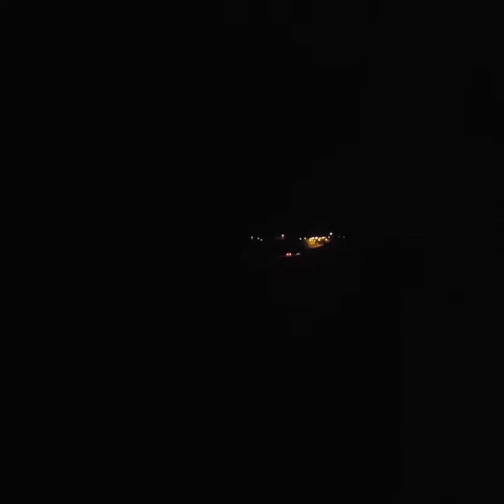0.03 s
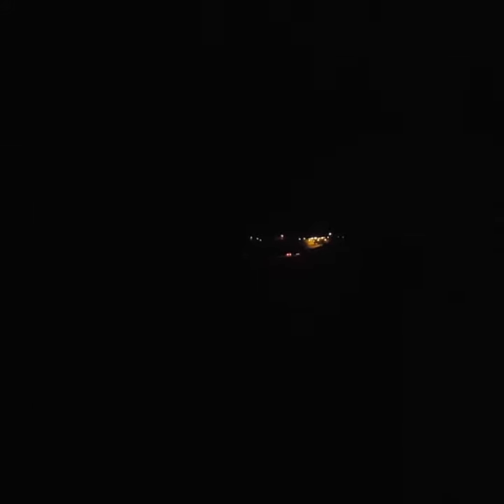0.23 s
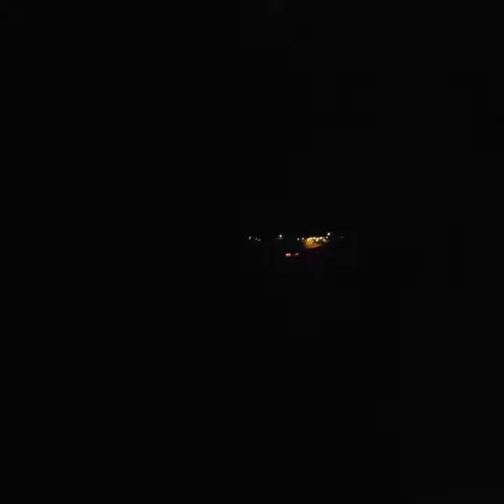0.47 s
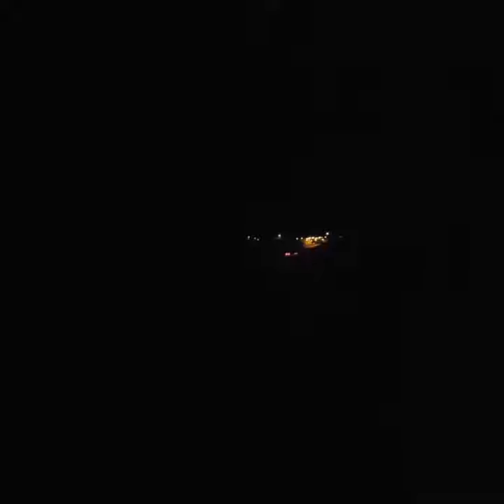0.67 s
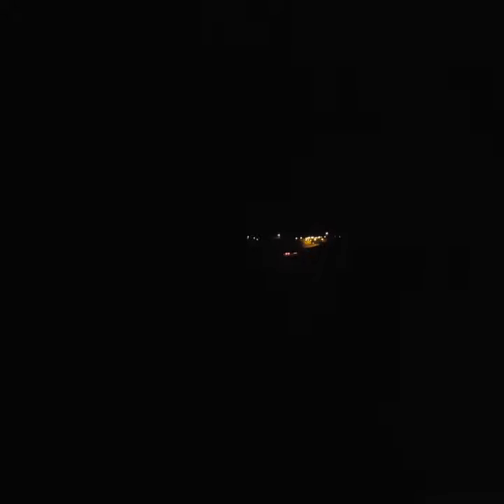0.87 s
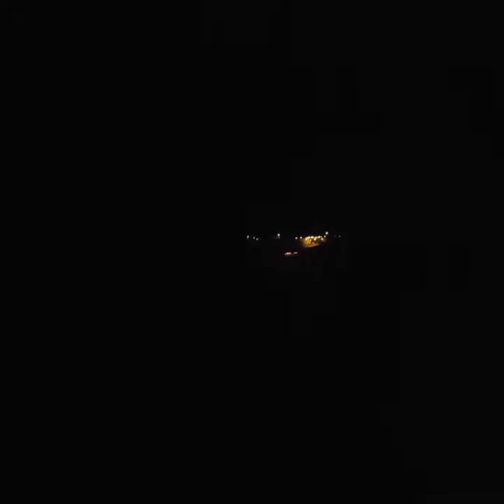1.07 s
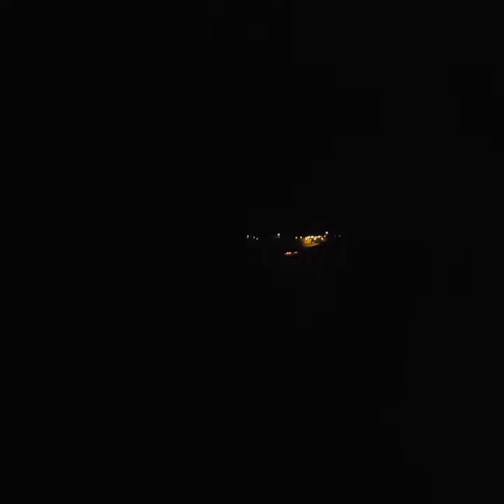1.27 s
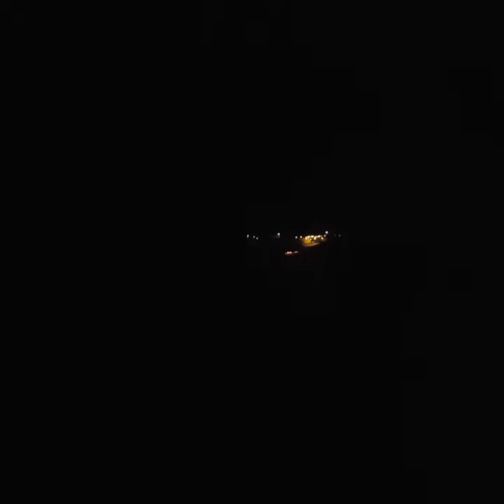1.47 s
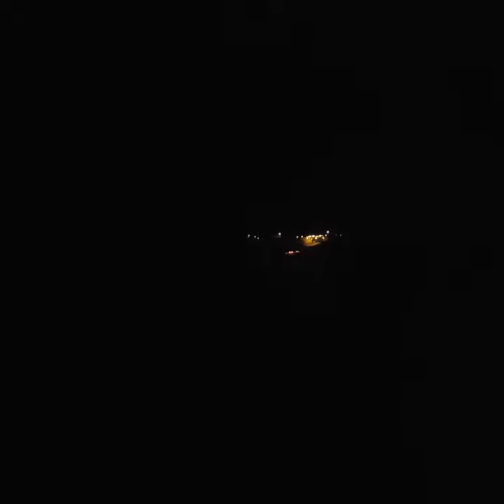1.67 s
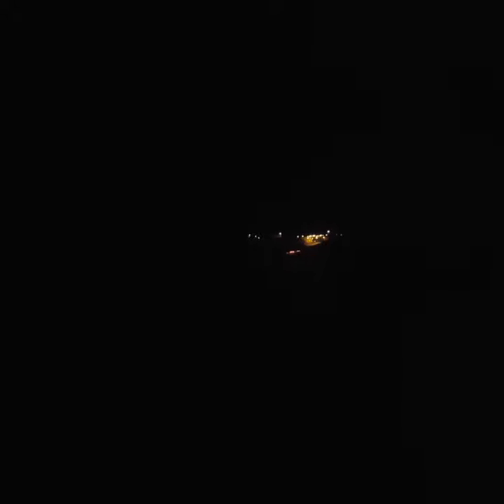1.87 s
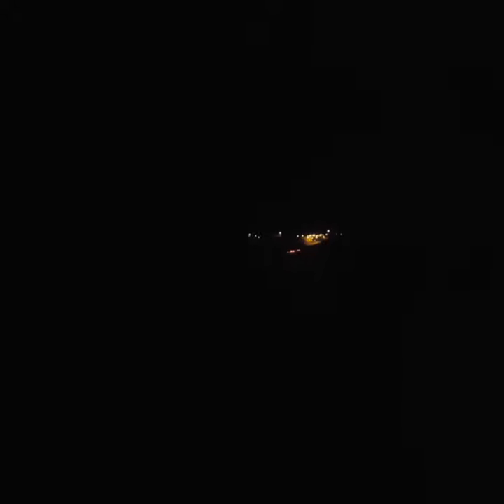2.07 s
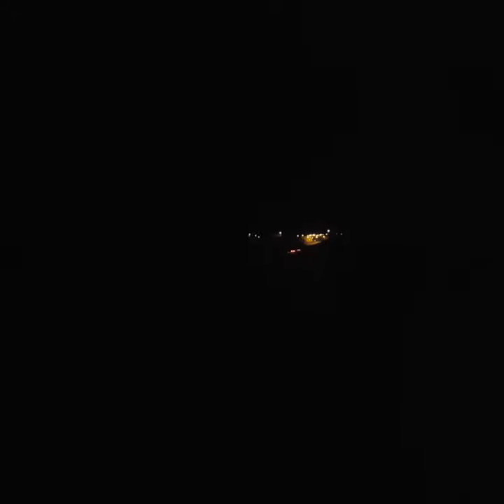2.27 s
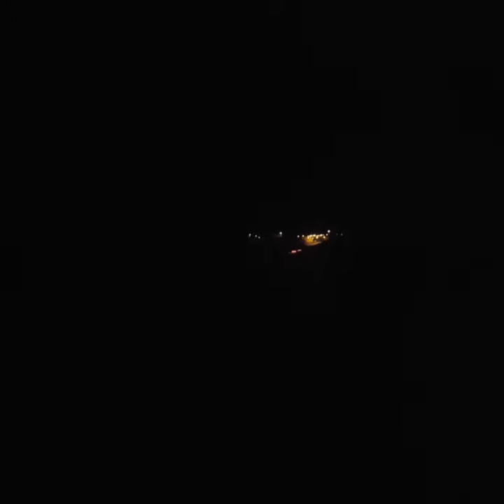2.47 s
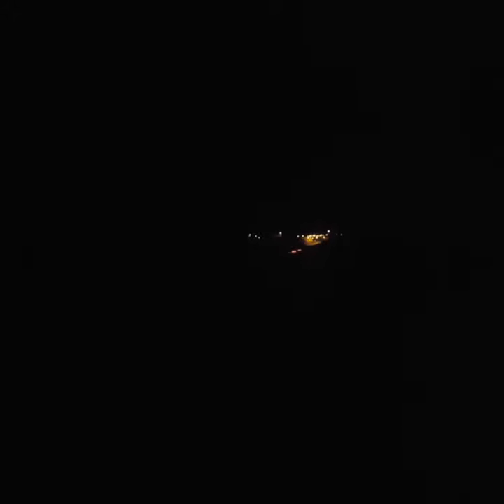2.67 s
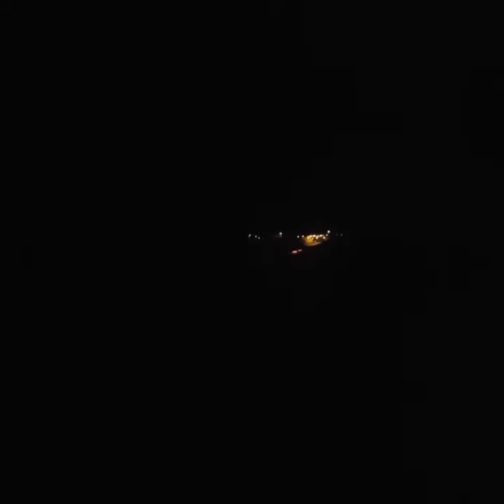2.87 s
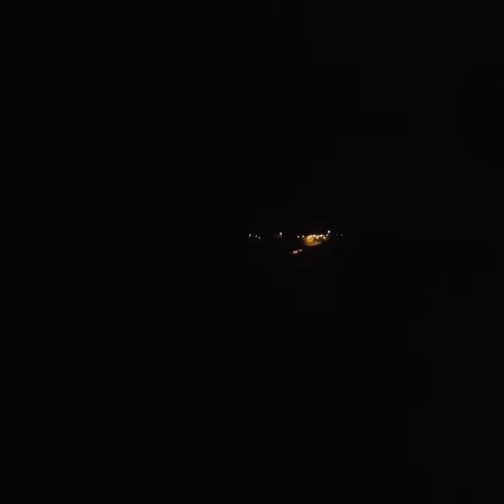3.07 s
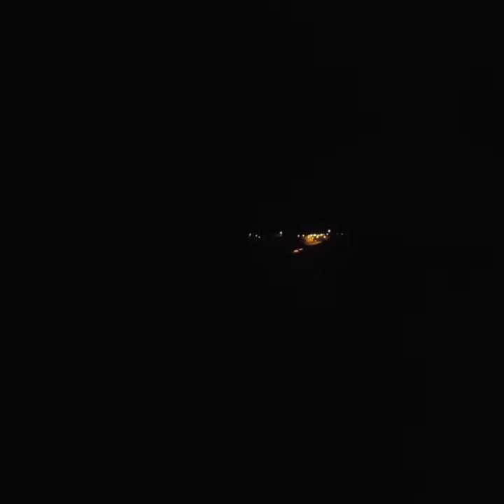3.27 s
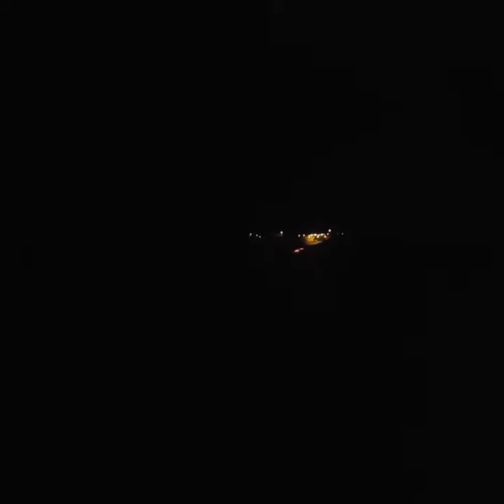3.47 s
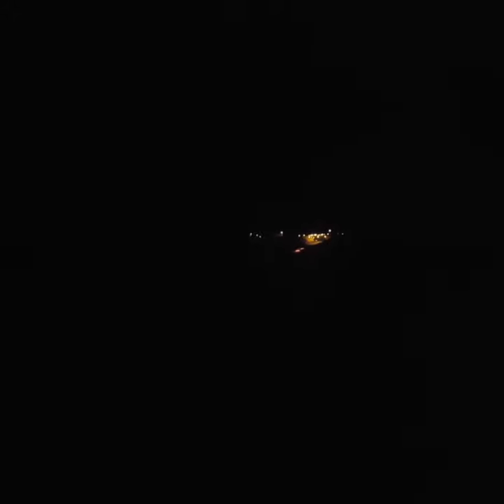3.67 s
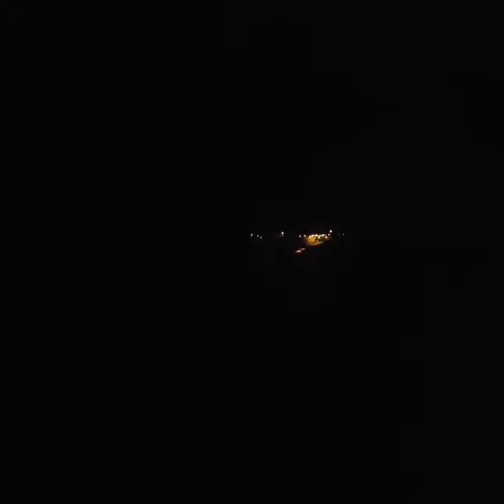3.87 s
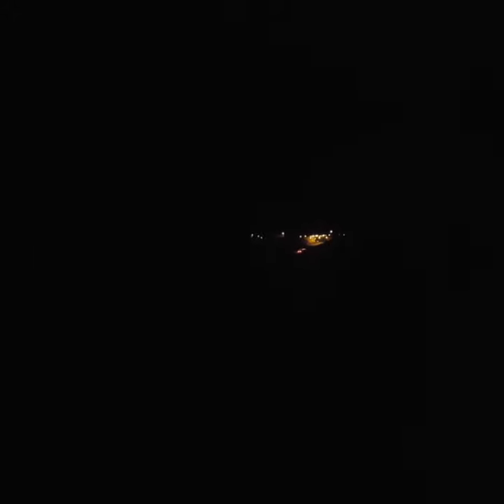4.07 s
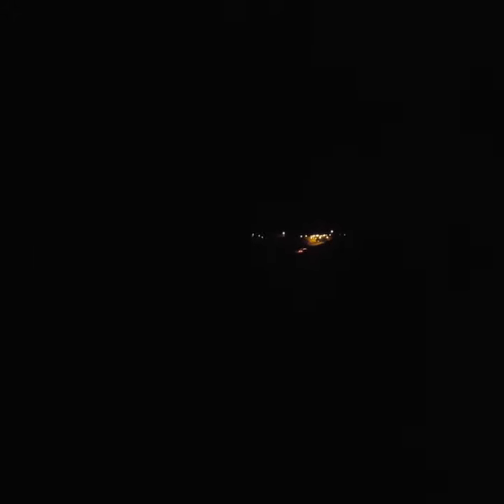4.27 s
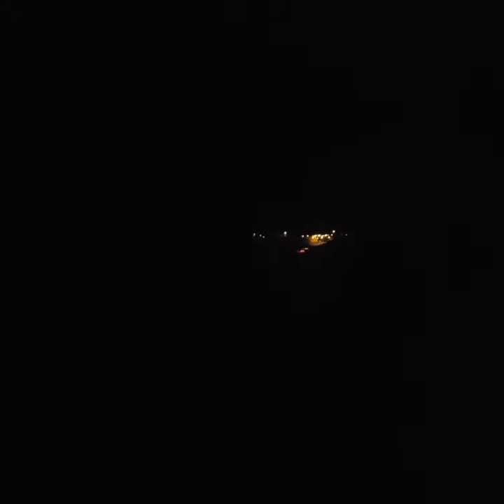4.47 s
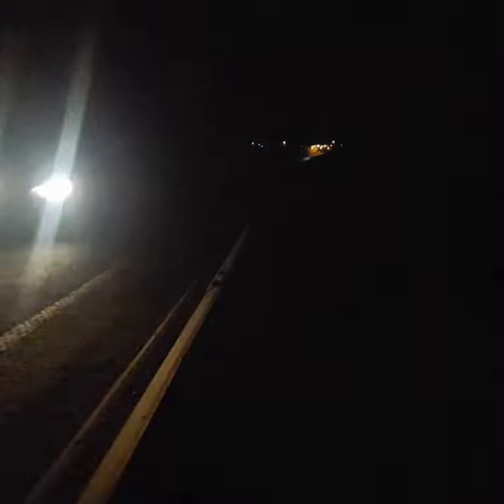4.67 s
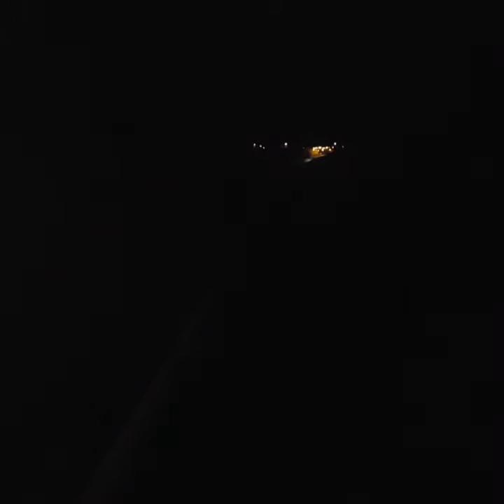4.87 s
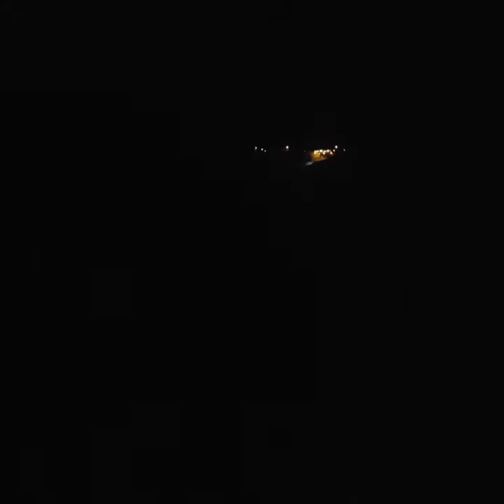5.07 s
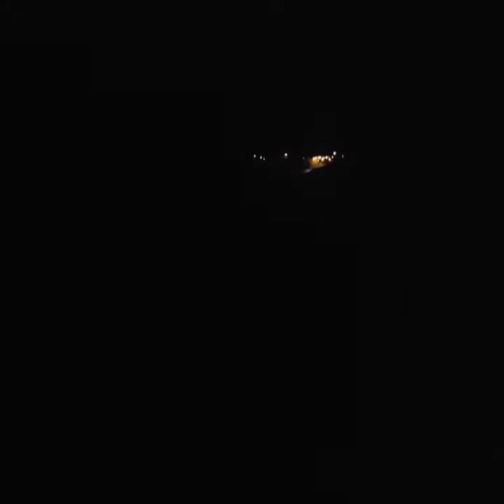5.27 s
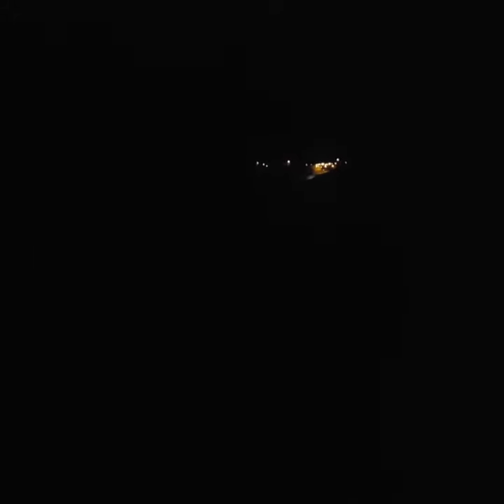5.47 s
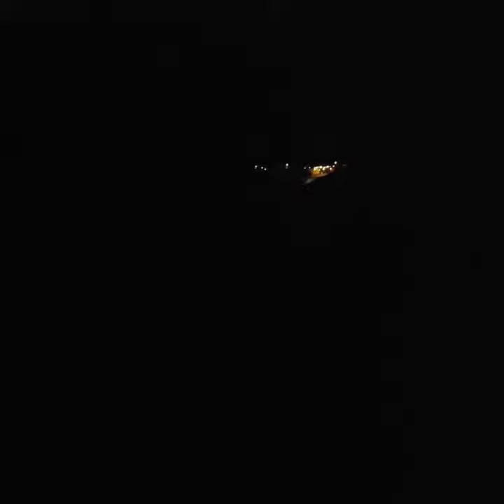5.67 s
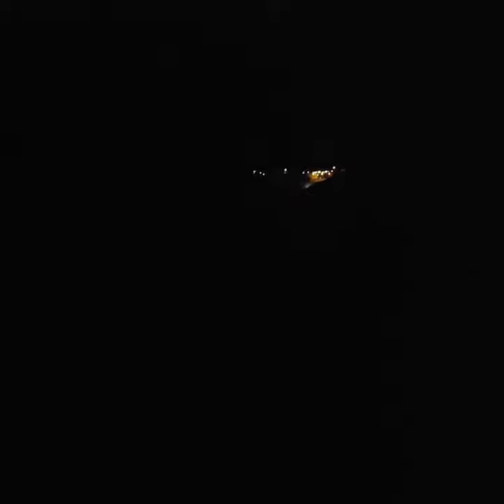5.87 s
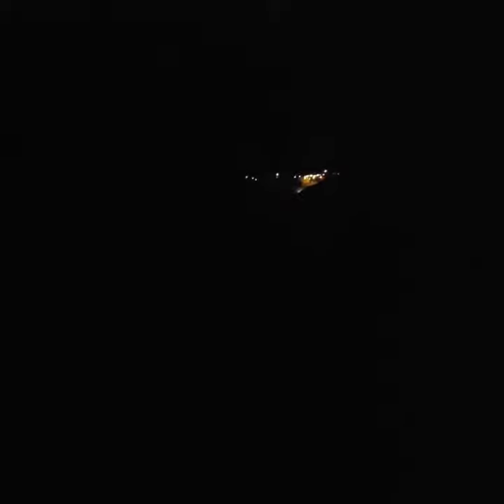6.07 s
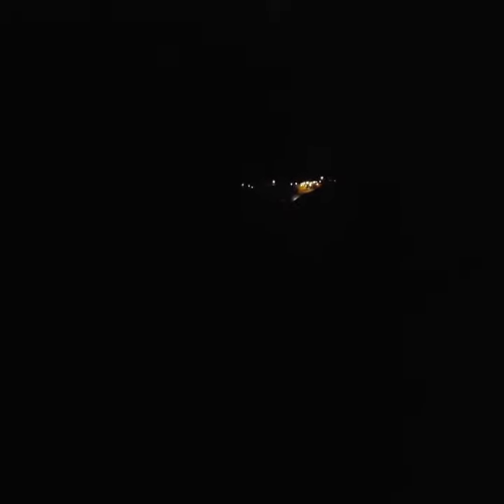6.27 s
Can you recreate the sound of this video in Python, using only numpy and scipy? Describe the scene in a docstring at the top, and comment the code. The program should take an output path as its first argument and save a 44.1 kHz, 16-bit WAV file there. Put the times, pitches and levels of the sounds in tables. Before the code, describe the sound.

Outdoor stereo roadside capture: a coarse, throbbing exhaust recedes with dulling tread noise, gradually lower and quieter. Faint dry ticks sit close to the microphone, and distant tyres bump across joints. A thin crackly hiss grows, a sharp click, then an instant jump to a big close pass-by, broad tyre roar with a hollow hum and air gusts, brighter on the left, fading behind.

```python
"""A car with a loud, lumpy exhaust draws away on a night road, its note sinking over the roar of its tyres.
Then the sound jumps abruptly to a vehicle sweeping past close on the left: tyre roar, hiss and pushed air.
The exhausts are stacks of sine waves; tyres and air are coloured noise; joints in the road thump and ring.
The far car is strong near 3.5 kHz in the right microphone port; above about 5 kHz the close vehicle
is brighter in the left one."""
import sys
import numpy as np
from scipy import signal
from scipy.fft import rfft, irfft, next_fast_len
from scipy.io import wavfile
from scipy.ndimage import uniform_filter1d, map_coordinates

SR = 44100
rng = np.random.default_rng(int(sys.argv[2]) if len(sys.argv) > 2 else 0)


def waveform_to_disk(signal):
    """Save audio, clipped to [-1, 1], as 16-bit WAV at the path in sys.argv[1]."""
    frames = np.transpose(np.atleast_2d(signal))
    scaled = np.clip(frames, -1, 1) * 32767
    samples = np.round(scaled).astype(np.int16)
    wavfile.write(sys.argv[1], SR, samples)


N = 278270

T = np.arange(N) / SR  # time of each sample [s]
SIZE = next_fast_len(N, True)
HZ = np.maximum(np.arange(SIZE // 2 + 1) * SR / SIZE, 1)  # frequency of each spectrum bin
# how alike the far car sounds in both ports: (frequency [Hz], likeness [1 = same, 0 = unrelated])
FAR_LIKENESS = [(200, .995), (500, .9), (850, .55), (1700, .35), (3000, .55), (5000, -.1)]
# how the far car leans to one side: (frequency [Hz], left minus right [dB])
FAR_BALANCE = [(200, -7), (700, 0.5), (1400, -2), (2400, -6), (3400, -17), (4000, -16.5), (5000, -9)]
# the sound jumps from the far car to the close vehicle
JUMP_S = 4.5568
# the close vehicle drives past in a straight line
PASS_S, SPEED_M_PER_S, DISTANCE_M = 5.03, 24, 4.8


def from_db(db):
    """Turn decibels into gain."""
    return 10 ** (np.asarray(db) / 20)


def rms_one(x):
    """Scale to unit power."""
    return x / np.sqrt(np.mean(x ** 2) + 1e-20)


def at_hz(points, hz):
    """Read a curve between its points on a log-frequency axis."""
    f, value = np.transpose(points)
    return np.interp(np.log(hz), np.log(f), value)


def drift(rate):
    """Smooth random wandering with a spread of one; a higher rate wanders faster."""
    steps = rms_one(uniform_filter1d(rng.standard_normal(2000), size=4))
    return np.interp(T * rate * 4, np.arange(len(steps)), steps)


def band(x, low_hz, high_hz):
    """Keep the sound between two frequencies."""
    sos = signal.butter(2, [low_hz, min(high_hz, .45 * SR)], "band", fs=SR, output="sos")
    return signal.sosfilt(sos, x + 1e-18)


def pan(left_db):
    """Left and right gains of constant total power, the left stronger by left_db."""
    ratio = from_db(np.atleast_1d(left_db))
    return np.array([ratio, np.ones_like(ratio)]) * np.sqrt(2 / (1 + ratio ** 2))


def soft_step(at_s, width_s, height):
    """A smooth rise from nothing to the given height."""
    return height * (1 + np.tanh((T - at_s) / width_s)) / 2


def humps(events, width_s):
    """Smooth swells and dips, in dB."""
    return sum(db * np.exp(-((T - s) / width_s) ** 2) for s, db in events)


def bursts(events, decay_s):
    """An envelope that jumps at each event and dies away."""
    return sum(from_db(db) * (T >= s) * np.exp(-np.abs(T - s) / decay_s) for s, db in events)


def two_ports(mid, side, alike):
    """Mix two unrelated noises into a left and right that are alike to the given degree."""
    return np.sqrt(1 + alike) * mid + np.sqrt(1 - alike) * side * [[1], [-1]]


def noise_bands(spectrum, likeness, balance, splits_hz):
    """Stereo noise of one colour, split at the given frequencies into bands of unit power."""
    mid, side = rfft(rng.standard_normal((2, SIZE)))
    rest = two_ports(mid, side, np.clip(at_hz(likeness, HZ), -1, 1)) * pan(at_hz(balance, HZ))
    # beyond the ends of the colour curve the noise falls away
    lowest_hz, highest_hz = spectrum[0][0], spectrum[-1][0]
    edges = 1 + (lowest_hz / HZ) ** 8 / 2 + (HZ / highest_hz) ** 12 / 2
    rest = rest * from_db(at_hz(spectrum, HZ)) / edges
    parts = []
    for hz in splits_hz:
        below = 1 / (1 + (HZ / hz) ** 8)
        parts.append(rest * below)
        rest = rest * (1 - below)
    return [rms_one(irfft(part)[:, :N]) for part in parts + [rest]]


def night_air(level_db=-73.5):
    """The still night air is a very faint, steady noise, almost unrelated in the two ports."""
    # colour of the air noise: (frequency [Hz], level [dB per Hz])
    colour = [(100, -1.5), (4000, 0), (8000, -2.5), (13000, -1), (16000, -3)]
    likeness, balance = [(100, 0.0021), (10000, 0.0059)], [(100, 6.5), (10000, -0.5)]
    noise, = noise_bands(colour, likeness, balance, [])
    return from_db(level_db) * noise


def low_hum(hz=53, level_db=-50.5):
    """A steady hum is one sine wave."""
    return from_db(level_db) * np.sqrt(2) * np.sin(2 * np.pi * hz * T)


def high_hiss(start_s=3.96, attack_s=.08, start_db=-76, growth_db_per_s=21.5, grain_db=2.5):
    """A thin, crackly hiss sets in and grows; fast random level changes make it crackle."""
    # colour of the hiss: (frequency [Hz], level [dB per Hz])
    colour = [(5000, 2), (9000, -6), (12000, 2), (15500, 0)]
    since_s = T - start_s
    level_db = start_db + growth_db_per_s * since_s + grain_db * drift(90)
    likeness, balance = [(100, 0.0074), (10000, 0.019)], [(100, 0), (10000, -13.0)]
    hiss, = noise_bands(colour, likeness, balance, [])
    return hiss * np.clip(since_s / attack_s, 0, 1) * from_db(level_db)


def ticks(decay_s=0.00019, low_hz=2000, high_hz=6500):
    """Tiny dry clicks close to the microphone ring for about a cycle or less."""
    # the clicks: (time [s], starting level before the band filter [dB], ring [Hz])
    clicks = [(0.6736, -40, 5800), (.7862, -44, 5800), (1.3534, -48, 5400), (1.557, -41, 5800),
              (3.3374, -39, 4800), (4.5026, -17, 2680)]
    ringing = sum(bursts([(s, db)], decay_s) * np.sin(2 * np.pi * hz * (T - s)) for s, db, hz in clicks)
    return band(ringing, low_hz, high_hz)


def distance_db(doubling_s=1.096):
    """Level lost as the far car draws away; it is twice as far off after doubling_s."""
    return -20 * np.log10(1 + T / doubling_s)


def road_joint(slap_db=-14, slap_s=0.01, thump_lag_s=.006):
    """At a road joint each axle slaps the tread, then sets the tyres ringing, dulled by distance."""
    # axles crossing joints: (time [s], strength of the thump [dB])
    crossings = [(3.514, -23), (3.542, -27), (3.583, -20), (3.612, -17.5)]
    # what the tyres ring with: (frequency [Hz], level [dB], decay [s])
    tyre_modes = [(185, 1, 0.011), (245, -8, .006), (570, -4, .007), (670, -8, .006)]
    thump = np.zeros(N)
    for s, db in crossings:
        start_s = s + thump_lag_s
        for hz, mode_db, decay_s in tyre_modes:
            ring = np.sin(2 * np.pi * hz * (T - start_s))
            thump += bursts([(start_s, db + mode_db)], decay_s) * ring
    slap = rng.standard_normal(N) * bursts(crossings, slap_s) * from_db(slap_db)
    both = band(thump, 120, 1500) + slap * pan(-12.0)
    return signal.sosfilt(signal.butter(8, 3500, fs=SR, output="sos"), both + 1e-18)


def far_tyres(hiss_follow=.93, waver_db=0.7, roar_share=.4):
    """Distant tread noise wavers in the night air and loses its top with distance."""
    # colour of the tyre noise: (frequency [Hz], level [dB per Hz])
    colour = [(310, -11.5), (400, -11), (520, -8.5), (700, -3.5), (800, -3), (1000, 1), (1260, -2.5),
              (1450, -9), (1800, -11), (2600, -24), (3400, -21.5), (4200, -35), (5300, -49.5)]
    # slow swells and dips, full in the hiss and partial in the roar: (time [s], level [dB])
    surges = [(.15, 1.7), (1.4, -1.0), (2.1, 1.7)]
    roar_start_db, roar_fade_db_per_s, hiss_start_db = -29, 0.65, -36.0
    roar, hiss = noise_bands(colour, FAR_LIKENESS, FAR_BALANCE, [1480])
    waver, surge_db = waver_db * drift(20), humps(surges, .3)
    roar_db = roar_start_db - roar_fade_db_per_s * T + waver + roar_share * surge_db
    hiss_db = hiss_start_db + hiss_follow * distance_db() + waver + surge_db
    return roar * from_db(roar_db) + hiss * from_db(hiss_db)


def pipe_overtones(hz, valley_db=-28):
    """Level of an overtone at this pitch: strong inside a pipe resonance, faint between them."""
    # pipe resonances: (frequency [Hz], width [Hz], level relative to the firing note [dB])
    resonances = [(299, 5, -17), (338, 4, -13), (350, 6, -13), (417, 6, -9), (443, 8, -11), (470, 10, -12),
                  (536, 8, -11), (575, 6, -14), (606, 5, -15), (640, 7, -16), (675, 12, -16),
                  (725, 20, -17), (1050, 220, -22)]
    power = from_db(2 * valley_db)
    for centre, width, db in resonances:
        power = power + from_db(2 * db) * np.exp(-((hz - centre) / width) ** 2)
    return 10 * np.log10(power)


def far_exhaust(fading_db=1.3, flutter_db=.45, jitter=0.0015, boom_db=-41.5, boom_follow=0.2):
    """Four firings fill each engine cycle; unequal cylinders add other orders and one strong puff."""
    # orders: (multiple of the cycle rate, level [dB], follows the beat [0 = only the firing note])
    orders = [(3, -6.3, .35), (4, -2.2, 0), (5, 2.5, .96), (6, -13, 0), (7, .5, 1.55), (8, -9.3, .3),
              (9, -18, .15)]
    # colour of the low exhaust boom: (frequency [Hz], level [dB per Hz])
    boom_colour = [(18, -24), (42, -22), (68, -16), (105, -16.5), (140, -9.5), (185, -4.5), (220, -10),
                   (275, -15), (400, -26)]
    # the car coasts: its four-stroke cycle rate sinks steadily
    cycle_hz, sag_hz_per_s = 32.19, 1.185
    rate = cycle_hz - sag_hz_per_s * T
    # the firing note and the beat between cylinders each suffer a share of the distance loss
    loss_db = distance_db()
    firing_db = -31.5 + 0.31 * loss_db
    # the beat eases by 5 dB around 1.12 s as the driver eases off the throttle
    beat_db = -27.5 + 0.65 * loss_db - soft_step(1.12, .2, 5.0)
    # firing multiples boom while the firing note sinks through a resonance of the pipe
    pipe_hz, pipe_width_hz, pipe_boost_db = 118.5, 6.3, 9.4
    pipe_db = pipe_boost_db / (1 + ((4 * rate - pipe_hz) / pipe_width_hz) ** 2)
    first_puff_s = .0129
    angle = 2 * np.pi * (np.cumsum(rate) / SR - cycle_hz * first_puff_s + jitter * drift(9.9))
    # the pipe spreads each puff in time [radians]; further off the puffs blur into a drone
    smear = .28 + soft_step(2.2, .5, .3)
    tone = np.zeros(N)
    for multiple, db, share in orders:
        k = round(multiple)
        level_db = db + firing_db + share * (beat_db - firing_db) + flutter_db * drift(3.8)
        gain = from_db(level_db + pipe_db * (k % 4 == 0))
        # the spread grows the further an order lies from the fifth
        tone -= gain * np.cos(k * angle - smear * (k - 5) ** 2)
    for k in range(10, 42):
        # orders between the firing multiples take an offset and an extra share of the distance loss
        drive_db = firing_db + (k % 4 > 0) * (.7 + .48 * loss_db)
        # short waves fade in and out as the path over the ground changes
        level_db = pipe_overtones(k * rate) + drive_db + fading_db * drift(1.5)
        tone += from_db(level_db) * np.cos(k * angle + rng.uniform(0, 2 * np.pi))
    boom, = noise_bands(boom_colour, FAR_LIKENESS, FAR_BALANCE, [])
    boom_level_db = boom_db + boom_follow * (beat_db - beat_db.mean())
    return np.sqrt(2) * tone * pan(0.61) + boom * from_db(boom_level_db)


def receding(abreast_s):
    """Share of the close vehicle's speed that points away: -1 coming, 0 abreast, 1 going."""
    along_m = SPEED_M_PER_S * (T - abreast_s)
    return along_m / np.hypot(along_m, DISTANCE_M)


def swell_db(name):
    """Level of one sound of the close vehicle, which swells and fades once."""
    # by sound: (loudest at [s], level [dB], rise [s], fall [s], steepness [1 = inverse distance])
    swells = { "air": (4.95, -33.5, 2.5, 0.73, 1.8), "roar": (4.9, -15.2, 1.15, .79, 2.6),
              "rush": (4.77, -15.5, .52, .8, 1.9), "hiss": (5.04, -27.5, .32, .27, 1.45),
              "sizzle": (5.0, -41, .42, .19, 1.5), "exhaust": (5, -30.5, .3, 1.2, 1.5),
              "throb": (4.96, -28, .16, .14, 2.2), "treads": (5.18, -18.5, .09, 0.26, 2.5),
              "horn": (5.18, -15.3, .38, .38, 1.65), }
    peak_s, peak_db, rise_s, fall_s, steepness = swells[name]
    away = (T - peak_s) / np.where(T < peak_s, rise_s, fall_s)
    return peak_db - 10 * steepness * np.log10(1 + away ** 2)


def wavering_note(hz, level_db, wobble, overtone_db, count):
    """A tone with a few overtones, unsteady in pitch and strength."""
    angle = 2 * np.pi * np.cumsum(hz * (1 + wobble * drift(20))) / SR
    overtones = sum(from_db(2 * drift(4)) * np.sin(k * angle) for k in range(2, count + 1))
    return from_db(level_db + 1.2 * drift(6.8)) * (np.sin(angle) + from_db(overtone_db) * overtones)


def past_the_ports(x, lead_ms, shade_db):
    """The right port hears the sound later and weaker."""
    left, right = x * pan(shade_db)
    late = np.arange(N) - lead_ms * SR / 1000
    return np.array([left, map_coordinates(right, [late], order=3, mode="nearest")])


def tyre_horn(width_hz=140, alike=0.48):
    """The horn between tread and road rings low from the front, higher from the side, then behind."""
    side_s, front_hz, side_hz, rear_hz = 5.07, 630, 720, 900
    away = receding(side_s)
    hz = side_hz + (np.where(away > 0, rear_hz, front_hz) - side_hz) * away ** 2
    # slow noise shifted up to the gliding pitch makes one broad resonance
    smooth = signal.butter(2, width_hz, fs=SR, output="sos")
    real, imag = signal.sosfilt(smooth, rng.standard_normal((2, 2, N)))
    carrier = np.exp(2j * np.pi * np.cumsum(hz) / SR)
    mid, side = rms_one(np.real((real + 1j * imag) * carrier))
    return from_db(swell_db("horn")) * rms_one(two_ports(mid, side, np.clip(alike, 0, 1)))


def close_vehicle(gust_db=0.7, flicker_db=0.65, grain_db=0.9, bass_shade=0.4, rush_shade=.75,
                  top_shade=.45, hiss_shade=.8, bass_lead=0.75, tread_side_db=1.0):
    """Pushed air, tyres and exhaust sweep by; long waves bend round to the far port more easily."""
    # colour of air and tyres: (frequency [Hz], level [dB per Hz])
    colour = [(25, -27), (60, -8), (130, -4), (300, -1), (450, -1.5), (650, 0), (850, -1.5), (1120, 1),
              (1500, -7), (1950, -11.5), (2400, -16.5), (2950, -25), (3400, -28), (4000, -29), (4600, -34),
              (5400, -43.5), (9800, -47.5), (11500, -54.5), (14000, -55)]
    # how alike the ports are: (frequency [Hz], likeness [1 = same, 0 = unrelated])
    likeness = [(100, .98), (350, .9), (650, .76), (1000, .5), (2000, .64), (3800, .55), (6000, .1)]
    # lean to one side: (frequency [Hz], left minus right [dB])
    balance = [(150, 1), (600, 1), (830, -2), (1100, 4.5), (1400, 5), (1850, 2), (2500, 4), (2950, 4.5),
               (3500, -1), (4200, -5.5), (5200, 5), (6300, 16), (7600, 28), (9600, 41), (13000, 29)]
    # gusts of pushed air: (time [s], level [dB])
    gusts = [(4.77, -28.5), (5.15, -36), (5.42, -34)]
    # brief swells and dips of the roar: (time [s], level [dB])
    surges = [(5.62, 2.5), (5.82, -2)]
    away, since_s = receding(PASS_S), T - PASS_S
    doppler = 1 / (1 + away * SPEED_M_PER_S / 343)  # speed of sound [m/s]
    # the left port leads, swinging with the bearing; low sounds take a share of this
    lead_ms = .35 + .17 * away
    # the right port falls into shade, the top first, then the rest; each sound takes its share
    shade_db = soft_step(5.73, .04, 7)
    top_shade_db = top_shade * shade_db + soft_step(5.19, .1, 11)
    air, roar, rush, hiss, sizzle = noise_bands(colour, likeness, balance, [130, 1100, 2400, 4600])
    # reading the noise faster or slower makes it brighter coming, duller going
    emitted = SR + np.cumsum(doppler * (T >= JUMP_S))
    rush = np.array([map_coordinates(port, [emitted], order=3) for port in rush])
    flicker, grain = flicker_db * drift(60), grain_db * drift(70)
    # the exhaust note is 200.6 Hz when abreast and sinks 13 Hz per second, besides the Doppler shift
    note_hz = (200.6 - 13 * since_s) * doppler
    exhaust = wavering_note(note_hz, swell_db("exhaust"), wobble=0.0128, overtone_db=-12.5, count=5)
    throb = wavering_note(note_hz / 2, swell_db("throb"), wobble=.015, overtone_db=-5, count=3)
    # the brief song of the treads
    song = wavering_note(742, swell_db("treads"), wobble=.02, overtone_db=-22, count=2)
    treads = song + tyre_horn()
    push = from_db(swell_db("air")) + sum(from_db(db) * np.exp(-((T - s) / .08) ** 2) for s, db in gusts)
    pushed_air = air * push * from_db(gust_db * drift(10))
    tyre_roar = roar * from_db(swell_db("roar") + flicker + humps(surges, .05))
    low = pushed_air + tyre_roar + exhaust + throb
    rush = rush * from_db(swell_db("rush") + flicker)
    hiss = hiss * from_db(swell_db("hiss") + grain)
    sizzle = sizzle * from_db(swell_db("sizzle") + grain)
    return (past_the_ports(low, bass_lead * lead_ms, bass_shade * shade_db)
            + past_the_ports(treads, lead_ms, shade_db + tread_side_db)
            + past_the_ports(rush, lead_ms, rush_shade * shade_db)
            + past_the_ports(hiss, lead_ms, hiss_shade * top_shade_db)
            + past_the_ports(sizzle, lead_ms, top_shade_db))


def scene():
    """The far car, then all at once the close vehicle, with the night air throughout."""
    far = low_hum() + high_hiss() + ticks() + road_joint() + far_tyres() + far_exhaust()
    jumped = np.clip((T - JUMP_S) / .0001, 0, 1)
    return night_air() + (1 - jumped) * far + jumped * close_vehicle()


def record(dry):
    """The sound opens and closes softly, the highest peaks are rounded and the top is cut."""
    fade = np.minimum(np.minimum(T, T[-1] - T) / .004, 1)
    rounded = fade * dry / (1 + dry ** 6) ** (1 / 6)
    cutoff_hz = 15600
    return signal.sosfilt(signal.ellip(10, .1, 80, cutoff_hz, fs=SR, output="sos"), rounded)


dry = scene()
out = record(dry)
waveform_to_disk(out)
```